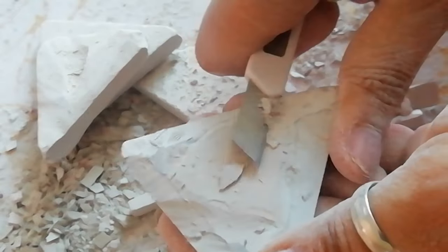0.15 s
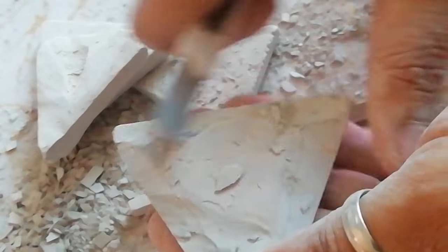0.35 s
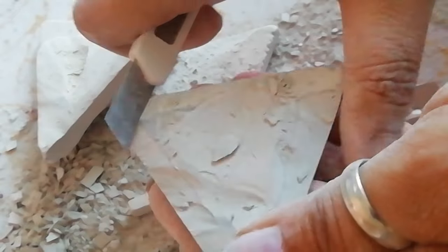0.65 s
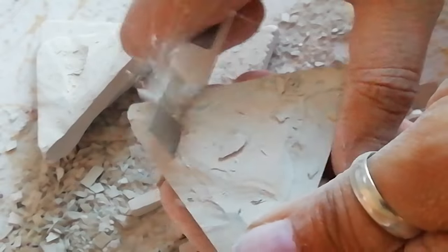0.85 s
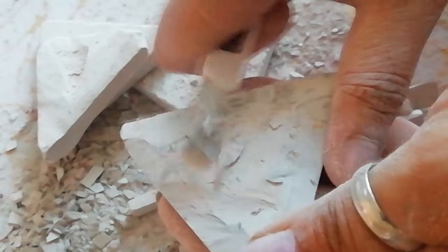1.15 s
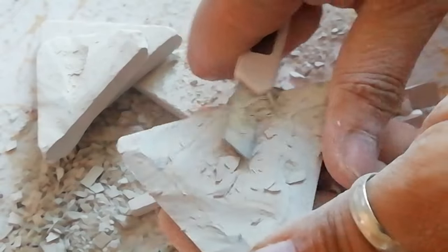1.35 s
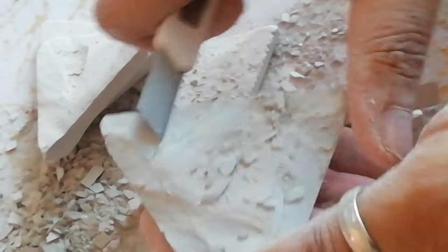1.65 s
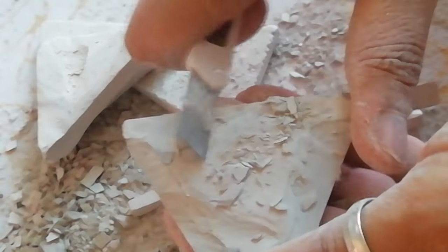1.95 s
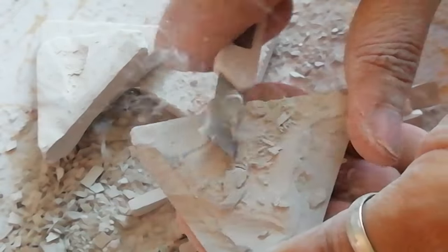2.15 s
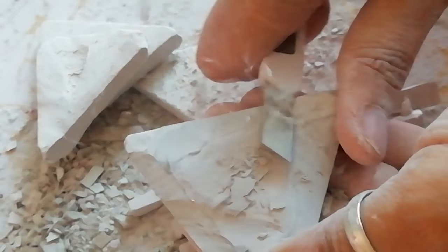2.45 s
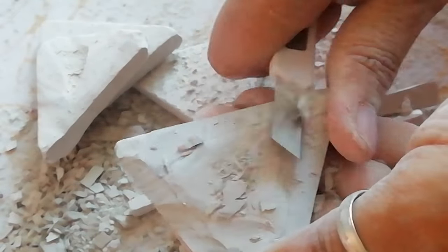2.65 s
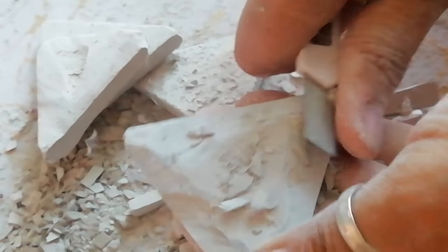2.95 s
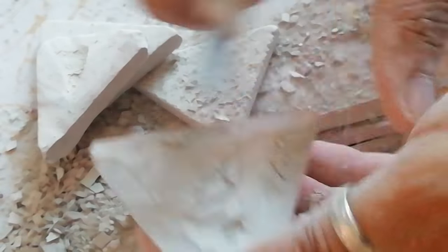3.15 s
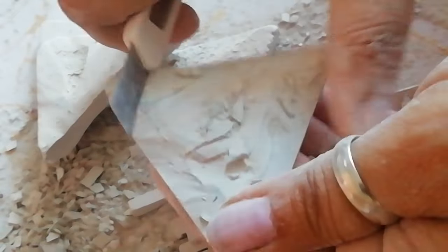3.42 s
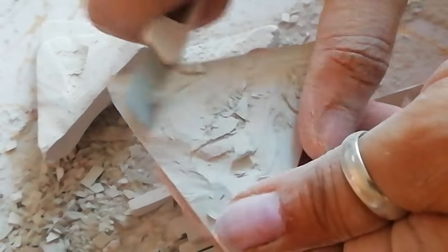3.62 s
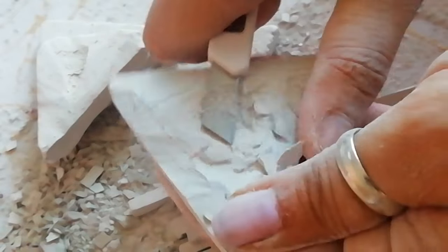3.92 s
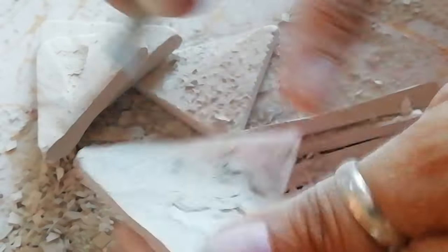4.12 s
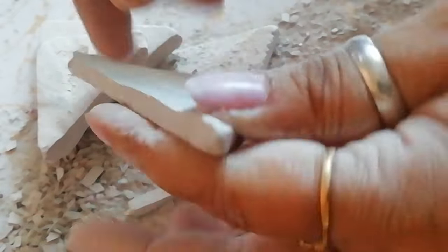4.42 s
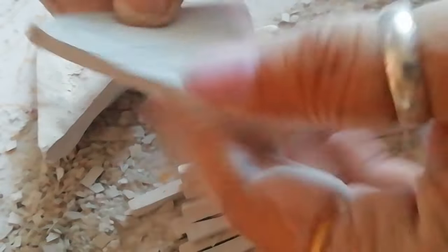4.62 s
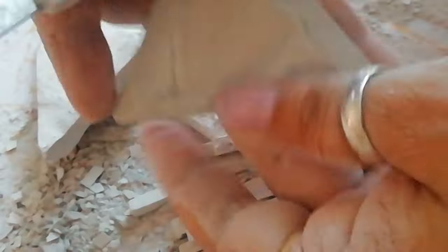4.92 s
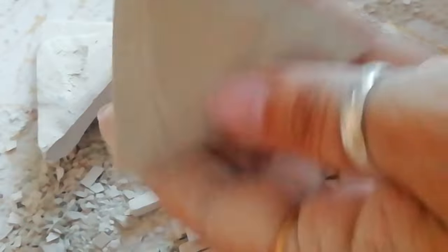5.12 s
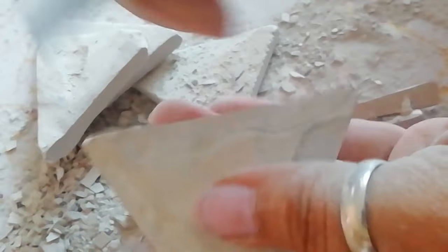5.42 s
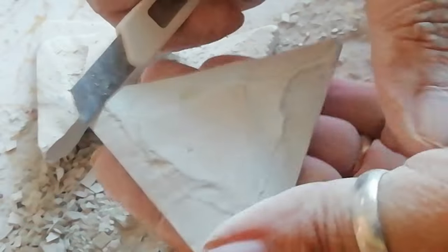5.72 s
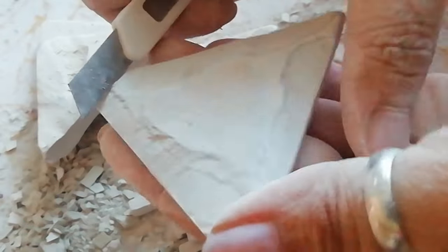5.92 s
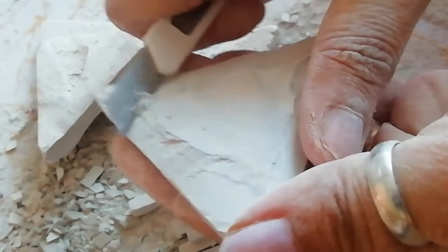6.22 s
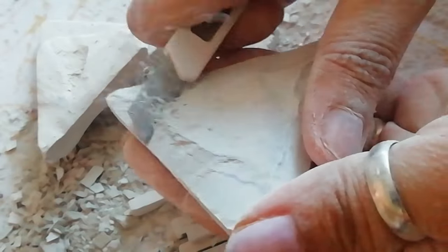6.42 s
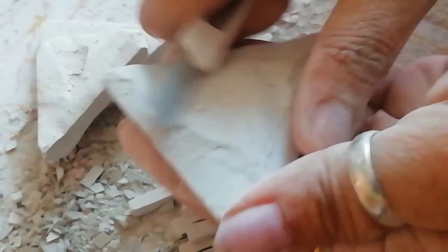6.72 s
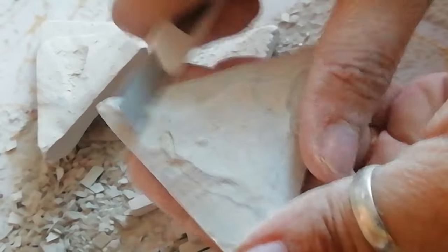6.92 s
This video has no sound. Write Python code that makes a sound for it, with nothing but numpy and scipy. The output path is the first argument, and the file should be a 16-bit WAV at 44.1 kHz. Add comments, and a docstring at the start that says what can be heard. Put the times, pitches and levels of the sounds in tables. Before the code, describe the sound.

A steel blade works a small hand-held slab of slate, close to the left side of a stereo phone; the right side is duller and shaded. A few light scrapes and snaps open the sound, then a dense crackling run from 0.7 to 1.3 s peaks with a hard crack near 1.2. After a pause, another thick cluster of brittle snaps runs from 1.9 to 2.7 s, thinning by 2.9. Short gritty strokes follow at 3.3 and 3.6 to 3.9 s, then weak crumbly scratching until about 4.5. Around 5 s the blade rests; faint scratches return at 5.7, light chipping at 6.1, a sharp snap at 6.5 and smaller ones to 7. Echoes are short and quiet. A soft fan drone continues throughout, with low wind thumps, notably near 0.6, 2.5, 5.4 and 6.5 s. From 3 s, faint treble ticks repeat about ten times per second on the left, occasionally skipping.

```python
"""Throughout, a fan drones and its draught buffets a phone's two microphones in gusts.
From the start a flat steel blade scrapes a hand-held slab of slate close to the left one: grit clicks and
short noise bursts for snapping flakes excite the slab's modes, with echoes and a shaded path to the right.
Flakes crowd near 1, 2, 4 and 6 s; from about 3 s a faint regular tick joins on the left.
Noise shaped in frequency and time makes the air sounds; narrow-band noise makes the drones."""
import sys
import numpy as np
from scipy import signal
from scipy.fft import rfft, irfft, next_fast_len
from scipy.io import wavfile
from scipy.ndimage import uniform_filter1d

SR = 44100
rng = np.random.default_rng(int(sys.argv[2]) if len(sys.argv) > 2 else 0)


def transcribe(signal):
    """Save signal, clipped to [-1, 1], as a 16-bit WAV file at the path in sys.argv[1]."""
    frames = np.atleast_2d(signal).T
    limited = np.clip(frames, -1, 1)
    pcm = np.round(limited * 32767).astype(np.int16)
    wavfile.write(sys.argv[1], SR, pcm)


N = 311787  # samples

# Modes of the slab: [f/Hz, decay width/Hz (decay rate / pi), relative level/dB]
SLAB_MODES = [(2232, 300, 2), (2740, 300, 3.5), (3160, 400, 3), (3650, 450, 5), (4505, 730, 0),
              (5185, 970, 7.5), (5823, 850, 4.5), (6400, 700, -6), (8750, 960, 1), (10220, 550, 6),
              (13750, 3100, 4), (15630, 2600, 9.5)]
# Strokes of the blade over the grit: [start t/s, length/s, level/dB, favoured low f/Hz, favoured high f/Hz,
# low-mode shift/dB, treble-mode shift/dB]
BLADE_STROKES = [(0, 0.16, -38, 2860, 4760, -8, -14.5), (0.177, 0.054, -41.5, 2850, 4700, -20, -20),
                 (0.433, 0.091, -46.5, 3550, 5900, -16, -6.5), (0.68, 0.99, -53, 2720, 4896, -8.5, -18.5),
                 (1.174, 0.17, -38.5, 2300, 5800, 7, -26), (1.702, .1, -57, 2770, 6060, -15, -21),
                 (1.881, 0.24, -44.5, 2890, 5280, -0.5, -11.5), (2.1, 0.19, -49, 2730, 5020, -4.5, -10.5),
                 (2.258, 0.21, -47, 2280, 4650, -4, -11.5), (2.46, 0.3, -49, 2230, 4710, 0.5, -9),
                 (3.331, 0.14, -34, 4700, 5750, -2, -17.5), (3.628, 0.12, -39.5, 2990, 4730, -1.5, -20),
                 (3.733, 0.2, -34.5, 3360, 5600, -5.5, -16), (3.97, 0.17, -56, 3480, 5200, -14, -7),
                 (4.244, 0.48, -53.5, 2980, 4840, -3, -5), (4.806, 0.18, -54, 3900, 5600, -14, -6),
                 (5.757, .11, -51.5, 3440, 5730, -18, -17), (6.075, 0.32, -55, 2730, 4810, -5, -18.5),
                 (6.373, .24, -60, 3600, 5300, 1, -11), (6.795, 0.098, -46, 5360, 6150, -4, -12),
                 (6.941, 0.09, -50, 2750, 4780, -4, -18)]


def gain_of(db):
    """Amplitude ratio from the logarithmic decibel scale."""
    return 10 ** (np.asarray(db) / 20)


def evened(x):
    """Normalisation of signal power: scales to rms 1."""
    return x / np.sqrt(np.mean(x ** 2) + 1e-20)


def read(points, hz):
    """Linear interpolation of a spectrum on a log-frequency axis."""
    f, value = np.transpose(points)
    return np.interp(np.log(hz + 1), np.log(f + 1), value)


def add(mix, s, sound):
    """Superposition: adds a sound to the mix in place from time s."""
    part = mix[round(s * SR):][:len(sound)]
    part += sound[:len(part)]


def smoothed(x, samples):
    """Low-pass smoothing by two moving averages in cascade."""
    return uniform_filter1d(uniform_filter1d(x, samples), samples)


def tint(x, points):
    """Linear filtering: multiplies the Fourier spectrum by a gain curve in dB."""
    size = next_fast_len(len(x))
    gain = gain_of(read(points, np.fft.rfftfreq(size, 1 / SR)))
    return irfft(rfft(x, size) * gain, size)[:len(x)]


def snaps():
    """Transient excitation: each flake snaps as a short noise burst that rings the slab, longer for big flakes.

    Row two is the part of the snap that radiates only towards the right port."""
    # Flakes snapping off: [t/s (2 ms after onset), level/dB (95th percentile of the magnitude)]
    flakes = [(0.0119, -20.5), (0.058, -42), (0.099, -53), (0.182, -33.5), (0.4266, -31), (0.454, -26),
              (0.507, -33.5), (0.696, -35), (0.7035, -32.5), (0.719, -27.5), (0.748, -38), (0.774, -19),
              (0.7983, -17.5), (0.8312, -14), (0.8715, -13), (0.9094, -22), (0.9732, -21.5),
              (0.9937, -15.5), (1.0324, -21.5), (1.0737, -10.5), (1.1816, -6.5), (1.21, -18.5),
              (1.227, -35), (1.2437, -16), (1.272, -20), (1.286, -24), (1.307, -31), (1.714, -42),
              (1.9124, -25.5), (1.9308, -19), (1.949, -32), (1.965, -26), (1.9792, -17), (2.0047, -12.5),
              (2.0913, -11.5), (2.151, -9), (2.201, -21.5), (2.27, -32), (2.2904, -14), (2.311, -20),
              (2.3241, -10.5), (2.361, -30), (2.386, -16.5), (2.4244, -28.5), (2.447, -23), (2.4789, -26),
              (2.4933, -21.5), (2.5458, -20.5), (2.557, -24), (2.596, -32.5), (2.62, -31), (2.6849, -23),
              (2.8589, -23), (2.917, -35.5), (3.3196, -34), (3.339, -42), (3.361, -27.5), (3.514, -26),
              (3.6428, -41), (3.6597, -28), (3.71, -24.5), (3.7377, -29), (3.7832, -20), (3.8152, -15.5),
              (3.859, -14.5), (3.981, -34), (4.059, -33.5), (4.258, -27.5), (4.3425, -39), (4.382, -37.5),
              (4.397, -35.5), (4.425, -38), (4.441, -42), (4.474, -39), (4.5027, -33.5), (4.514, -46),
              (5.685, -39), (6.087, -40), (6.111, -36), (6.12, -34), (6.1458, -24), (6.1934, -31.5),
              (6.2423, -34.5), (6.2993, -30), (6.391, -15.5), (6.42, -25), (6.4367, -23.5), (6.509, -10.5),
              (6.829, -20.5), (6.879, -44), (6.979, -32.5), (7.045, -36), (7.064, -38)]
    big_db, big_low, big_treble = -22, .1, .08  # reference level; dB of low and treble ring per dB above it
    out = np.zeros((2, N))
    chance = rng.standard_normal((len(flakes), 1000 + len(SLAB_MODES)))
    for (s, db), z in zip(flakes, chance):
        length = int(np.clip(SR * (0.008 + .00003 * db), 60, 500))
        spot_db = 3 * z[1000:, None]  # each flake sits at its own spot on the slab
        # the stroke under way, or else the nearest in time, sets the ring
        stroke = min(BLADE_STROKES, key=lambda row: abs(s - np.clip(s, row[0], row[0] + row[1])))
        *_, low_hz, high_hz, low_db, treble_db = stroke
        big = db - big_db
        spread_db = favoured(low_hz, high_hz, 9.5) + spot_db
        body = ring(low_db + big_low * big, treble_db + big_treble * big, spread_db)
        window = signal.windows.tukey(length, .8)
        left = np.convolve(z[:length] * window, body)
        right = np.convolve(z[500:][:length] * window, body)
        scale = gain_of(db) / np.percentile(abs(left[:length + 40]), 95)
        onset = max(s - .002, 0)
        add(out[0], onset, scale * left)
        add(out[1], onset, scale * right)
    return out


def drag():
    """Forced excitation: grit crushed under the edge rings the slab, each stroke at its own place."""
    treble_lift_db = 5.5
    early, roundness = 0.36, 0.75  # each stroke swells and fades in one arch that peaks early
    out, clicks = np.zeros(N), grit()
    for start, length, db, low_hz, high_hz, low_db, treble_db in BLADE_STROKES:
        part = clicks[round(start * SR):][:round(length * SR)]
        arch = np.sin(np.pi * np.linspace(0, 1, len(part)) ** early) ** 2
        body = ring(low_db, treble_db + treble_lift_db, favoured(low_hz, high_hz, 18.7))
        body = body / np.linalg.norm(body)
        add(out, start, gain_of(db) * signal.oaconvolve(part * arch ** (roundness / 2), body))
    return out


def crumbs(breaks):
    """Energy relaxation: loose bits keep crumbling after each break, at a rate of decay set by 27 ms."""
    fade = np.exp(-1 / (0.027 * SR))
    body = ring(-1, -14)
    energy = signal.lfilter([1 - fade], [1, -fade], breaks ** 2)
    clicks = grit() * np.sqrt(energy)
    return gain_of(-14.5) * signal.oaconvolve(clicks, body / np.linalg.norm(body))[:N]


def grit():
    """Random impulse process: a stream of clumped clicks of uneven size."""
    clicks_per_s = 5000
    clumps = gain_of(4 * evened(smoothed(rng.standard_normal(N), 170)))
    size = gain_of(2.0 * np.minimum(rng.exponential(1, N), 5)) * rng.standard_normal(N)
    struck = rng.random(N) < clicks_per_s / SR
    return evened(size * struck * clumps)


def ring(low_db, treble_db, spread_db=0):
    """Modal superposition: the slab's impulse response sums modes that swell and die within milliseconds."""
    hz, width, db = np.transpose(SLAB_MODES)[:, :, None]
    t = np.arange(512) / SR
    group_db = np.where(hz < 4000, low_db, np.where(hz > 7500, treble_db, 0))
    swell = width ** 2 * t * np.exp(-np.pi * width * t)
    return (gain_of(db + group_db + spread_db) * swell * np.cos(2 * np.pi * hz * t)).sum(0)


def favoured(low_hz, high_hz, by_db):
    """Selective modal excitation: extra dB near the two pitches that the blade's place brings out."""
    modes = np.transpose(SLAB_MODES)[0][:, None]
    distance = np.log(modes / [low_hz, high_hz]) / .09
    return by_db * np.exp(-distance ** 2).sum(1, keepdims=True)


def nearby(x):
    """Reverberation: hands, bench and walls return a dense tail, each band decaying at its own speed."""
    # Decay of the echoes: [f/Hz, time to fall 60 dB/s]
    decay = [(3000, 0.27), (10000, 0.061)]
    hz, t, z = signal.stft(rng.standard_normal((2, SR // 3)), SR, nperseg=128)
    t60 = np.maximum(read(decay, hz), .02)[:, None]
    tail = signal.istft(z * gain_of(-60 * t / t60), SR, nperseg=128)[1]
    tail[:, :120] = 0  # no echo in the first 120 samples
    return signal.fftconvolve(x[None], tail / np.linalg.norm(tail[0]), axes=1)[:, :N]


def far_port(x):
    """Diffraction: the phone's body shades the right port; sound bends round it late, smeared over other paths."""
    # Acoustic shadow at the right port: [f/Hz, level/dB]
    shadow = [(1200, -11), (2000, -3.5), (3300, -1.5), (5500, -22.5), (9000, -8), (13000, -19.5),
              (14800, -11)]
    late = 26  # samples
    paths = 0.45 * rng.standard_normal(200) * np.exp(-abs(np.arange(200) - late) / 14.0)
    paths[late] = 1
    return tint(np.convolve(x, paths / np.linalg.norm(paths))[:N], shadow)


def draught():
    """Turbulent pressure: lumpy low noise in gusts, one part common to both ports and one separate in each."""
    # Spectrum of the pressure noise: [f/Hz, relative spectrum level/dB]
    push_spectrum = [(15, -1), (35, 9), (70, 9.5), (130, 2), (220, -7), (400, -58)]
    # Gusts added to the lull: [peak t/s, level/dB, half length/s (fall to 1/e)]
    gusts = [(0, -42, 0.026), (0.248, -39, 0.043), (0.645, -30.5, 0.016), (1.08, -42, 0.047),
             (2.393, -36.5, 0.044), (2.484, -29, 0.076), (2.64, -29, 0.053), (2.731, -32, 0.045),
             (2.897, -40.5, 0.075), (4.036, -40.5, 0.042), (5.412, -28.5, 0.042), (5.56, -36, 0.052),
             (6.152, -38.5, 0.041), (6.288, -34.5, 0.075), (6.504, -31, 0.087), (6.84, -48, 0.17)]
    lull_db = -50
    lumps = gain_of(3.2 * evened(smoothed(rng.standard_normal(N), 600)))
    shared, one, other = (evened(tint(v * lumps, push_spectrum)) for v in rng.standard_normal((3, N)))
    apart = [(30, 3), (70, -21.5), (130, -8.0)]  # separate part: [f/Hz, level/dB]
    t = np.arange(N) / SR
    level = gain_of(lull_db) + sum(gain_of(db) * np.exp(-((t - s) / half) ** 2) for s, db, half in gusts)
    return level * (shared + np.array([tint(one, apart), tint(other, apart)]))


def fan():
    """Partially coherent broadband noise, steady with slight patches, plus two wavering narrow-band drones."""
    # Spectrum of the airy noise: [f/Hz, relative spectrum level/dB]
    air_spectrum = [(40, -19), (110, -9.5), (230, -10.5), (400, -12), (600, -26), (1000, -8), (1300, -21),
                    (1700, -15.5), (2050, -26), (3700, -34), (5600, -33), (7400, -51), (9000, -52.5),
                    (14800, -45.5), (16500, -58)]
    # Coherence of the two ports: [f/Hz, left-right likeness (1 = same)]
    likeness = [(60, 0.79), (200, 1), (400, 0.067), (1300, 0.49), (2400, 0.039)]
    # Balance of the two ports: [f/Hz, left minus right level/dB]
    balance = [(1300, -0.5), (2400, 8), (4400, 11), (8000, 9), (15000, 0.5)]
    # Drones: [f/Hz, bandwidth/Hz, rms level/dB]
    drones = [(266.9, 28.6, -53), (404.7, 2.8, -64.5)]
    air_db, lag_s = -44.5, .0001  # rms level; delay from left port to right
    frames, hz = N // 512 + 5, np.fft.rfftfreq(2048, 1 / SR)
    a, b, c, d, patches = rng.standard_normal((frames, 1025, 5)).T
    patches = evened(uniform_filter1d(uniform_filter1d(patches, 20, 0), 8, 1))  # over frequency, then time
    same = np.clip(read(likeness, hz), -1, 1)[:, None]
    late = np.exp(-2j * np.pi * hz * lag_s)[:, None]
    lean = gain_of(read(balance, hz) / 2)[:, None]
    left = a + 1j * b
    right = same * left * late + np.sqrt(1 - same ** 2) * (c + 1j * d)
    z = np.array([left * lean, right / lean])
    z *= gain_of(read(air_spectrum, hz)[:, None] + 1.22 * patches) * 2 / (lean + 1 / lean)
    out = gain_of(air_db) * evened(signal.istft(z, nperseg=2048, noverlap=1536)[1][:, :N])
    for f, width, db in drones:
        r = np.exp(-np.pi * width / SR)  # pole radius
        noise = rng.standard_normal(N) + 1j * rng.standard_normal(N)
        waver = signal.lfilter([1], [1, -2 * r, r * r], noise)
        carrier = np.exp(2j * np.pi * f * np.arange(N) / SR)
        out += gain_of(db) * evened((waver * carrier).real)
    return out


def tick():
    """Periodic transient: a faint, very short treble noise burst that decays at once and skips a few beats."""
    # Beats left silent: [beat number from 0]
    missed = [1, 19, 25, 37, 38]
    first_s, every_s = 2.9708, .1024
    out, t = np.zeros(N), np.arange(90) / SR
    for k, s in enumerate(np.arange(first_s, N / SR, every_s)):
        if k not in missed:
            add(out, s - .0006, rng.standard_normal(90) * np.exp(-t / 0.0014))
    return gain_of(-47.5) * tint(out, [(4000, -25), (9000, -10), (12500, 2)])


def scene():
    """Superposition at two ports: blade on slate near the left one, in the fan's air."""
    breaks, aside = snaps()
    slate = breaks + drag() + crumbs(breaks)
    echoes = gain_of(-15) * nearby(slate)
    left = slate + echoes[0] + tick()
    right = far_port(0.99 * slate + 0.39 * aside + gain_of(6.0) * echoes[1])
    return np.array([left, right]) + fan() + draught()


def record(dry):
    """Low-pass filtering: the treble rolls off steeply above 15.2 kHz, then a band limit follows."""
    edge_hz = 16800
    soft = np.array([tint(v, [(15200, -0.5), (15800, -35), (16600, -33)]) for v in dry])
    band = signal.firwin(511, edge_hz, window=("kaiser", 9), fs=SR)
    return signal.oaconvolve(soft, band[None], "same")


dry = scene()
out = record(dry)
transcribe(out)
```